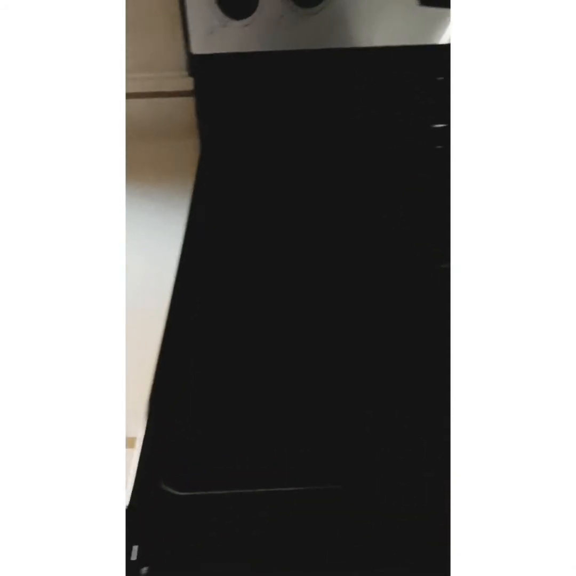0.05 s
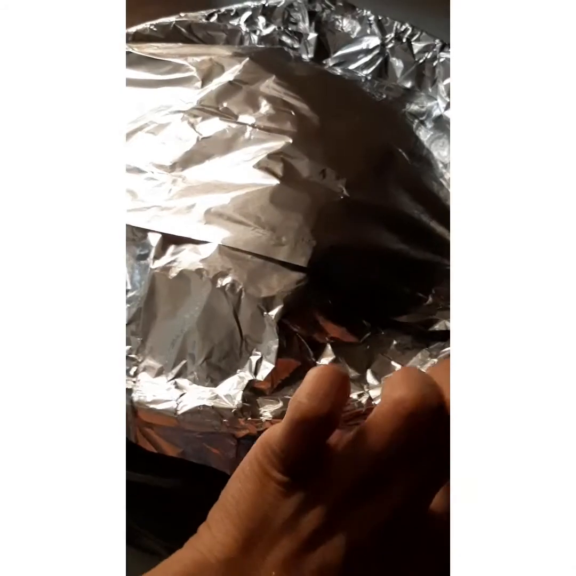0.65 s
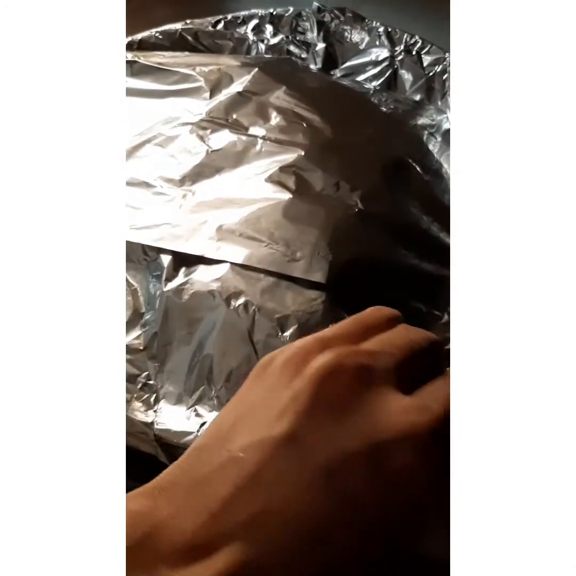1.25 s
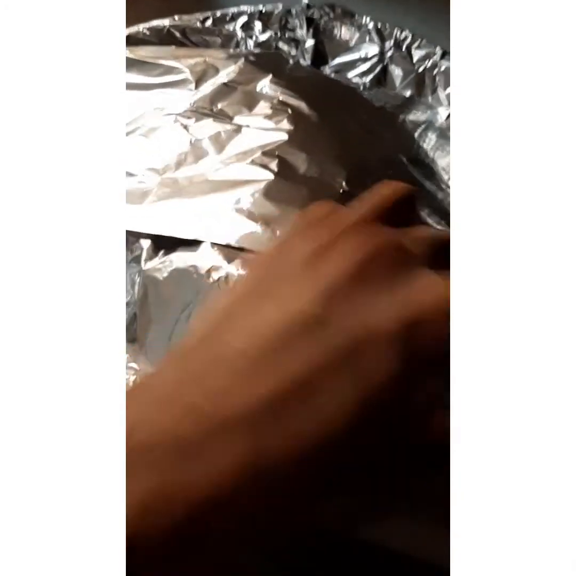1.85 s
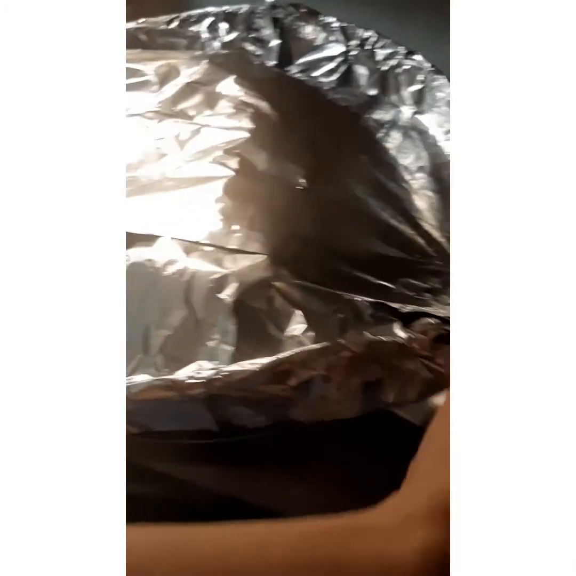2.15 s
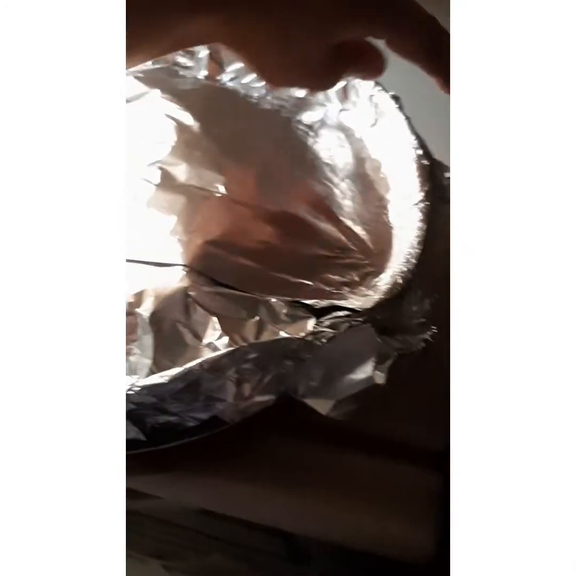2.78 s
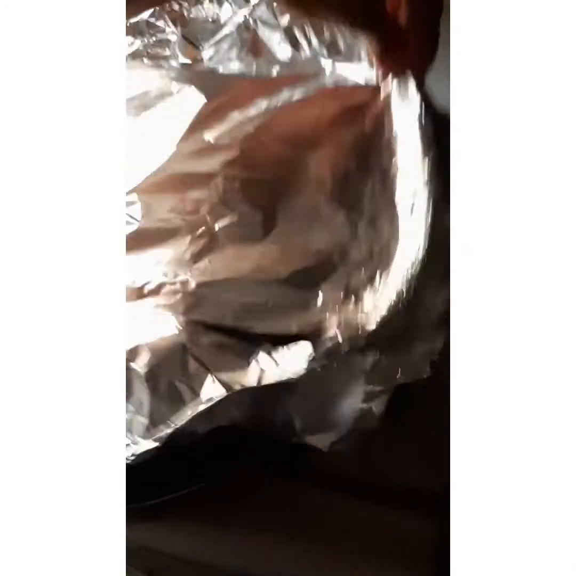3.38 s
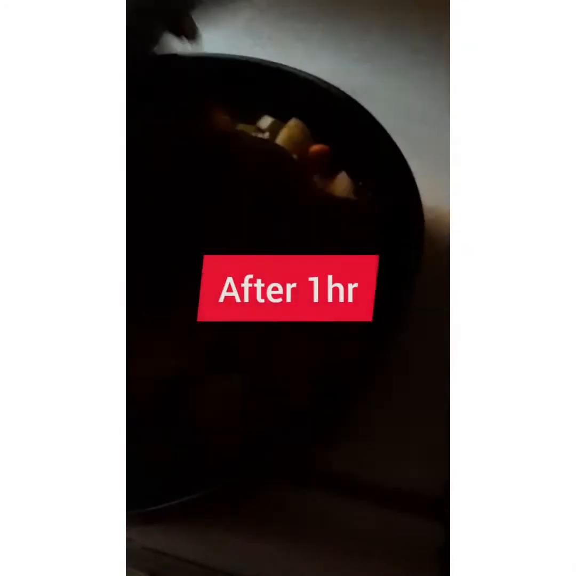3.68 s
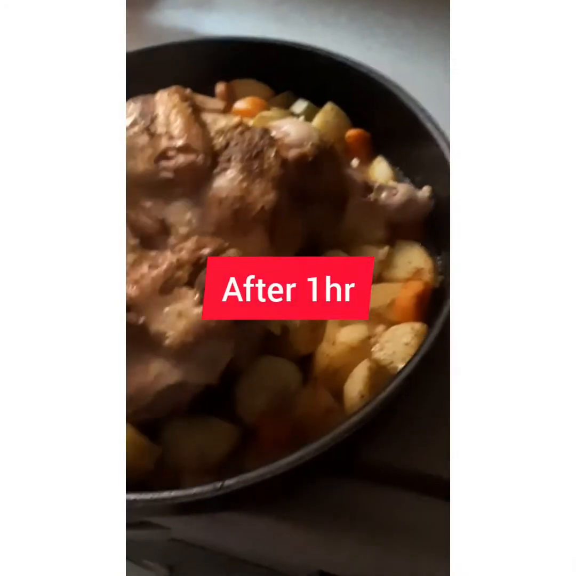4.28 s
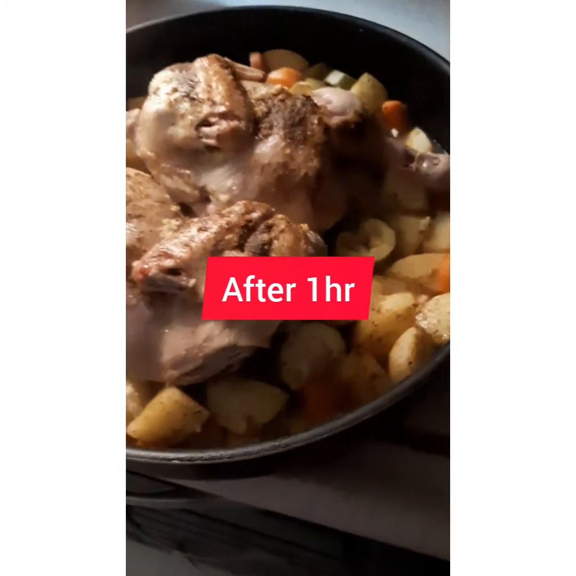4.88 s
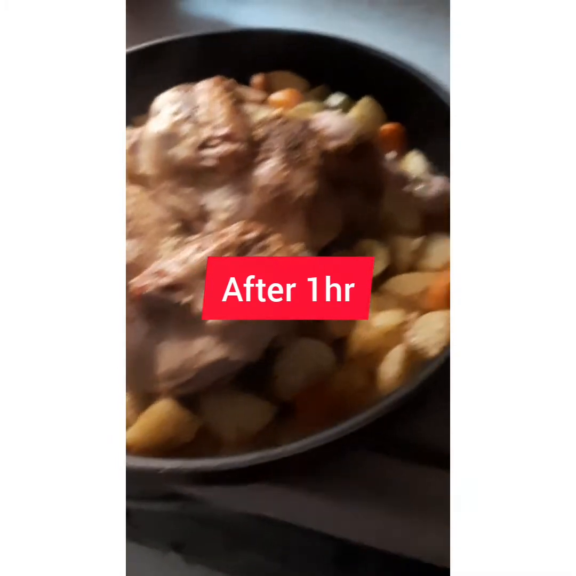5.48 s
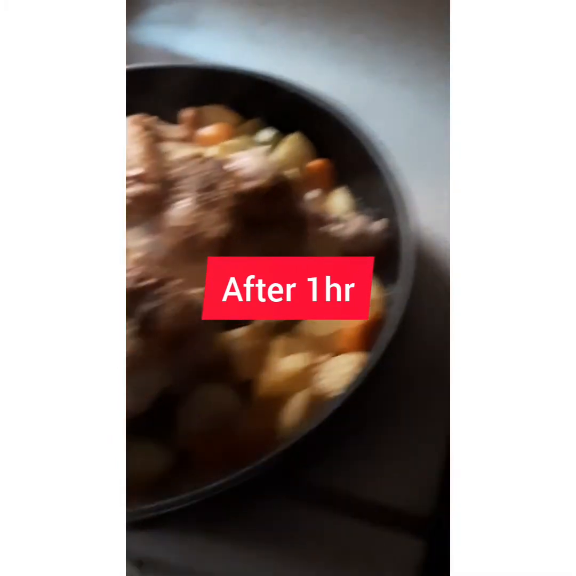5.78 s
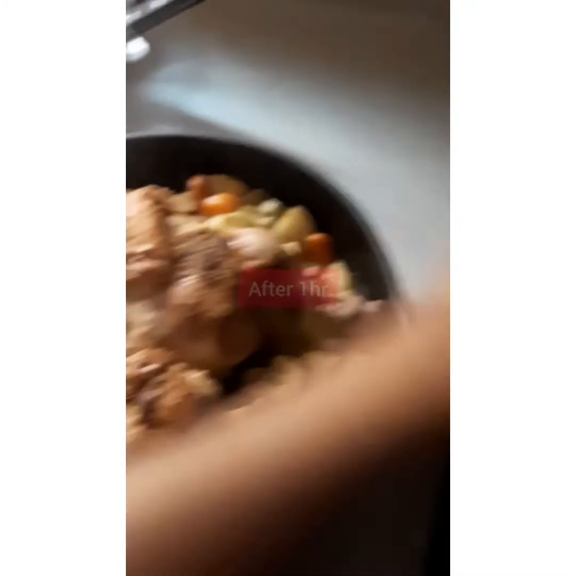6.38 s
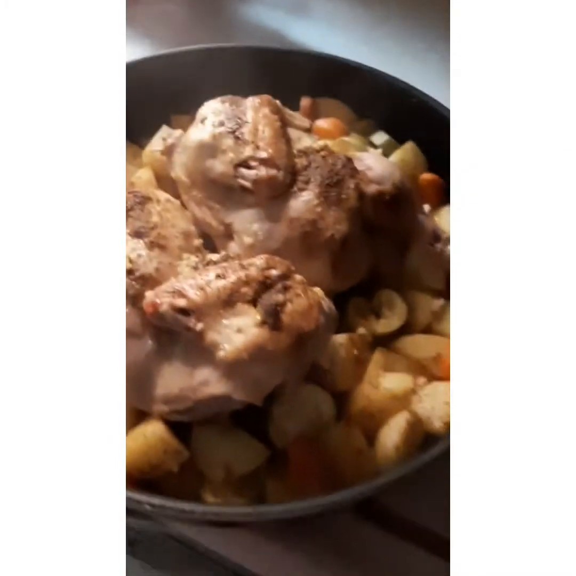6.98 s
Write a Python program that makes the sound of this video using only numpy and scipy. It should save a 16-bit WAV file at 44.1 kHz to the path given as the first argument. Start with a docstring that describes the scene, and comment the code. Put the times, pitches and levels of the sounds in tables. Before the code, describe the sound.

Aluminium foil crinkles close by as it is picked off a pan, then pulled away and crumpled, over a faint appliance hum.

```python
"""Foil off a roasting pan

A small kitchen, a phone microphone close in: aluminium foil is picked loose from the rim of a pan,
pulled off and crumpled. Every crease that buckles is a tiny click that rings a patch of the sheet for
a few milliseconds; larger folds give way in short avalanches. An appliance hums behind it, and moving
air buffets the microphone ports now and then."""
import sys
import numpy as np
from scipy import signal
from scipy.fft import rfft, irfft, next_fast_len
from scipy.io import wavfile
from scipy.ndimage import uniform_filter1d, map_coordinates

SR = 44100
rng = np.random.default_rng(int(sys.argv[2]) if len(sys.argv) > 2 else 0)


def log_audio(samples):
    """Write samples as a 16-bit WAV file to the path given in sys.argv[1]."""
    # one column per channel
    frames = np.atleast_2d(samples).T
    # limit to full scale, then quantise
    limited = np.clip(frames, -1, 1)
    pcm = np.round(limited * 32767).astype(np.int16)
    wavfile.write(sys.argv[1], SR, pcm)


N = 319284

# folds that give way: (time [s], relative level [dB], sharp part against middle part [dB])
FOLD_SNAPS = [(.349, -48.5, -9), (.422, -52, 0), (.474, -49, -19), (.53, -53, -6), (.64, -58, -14),
              (.741, -41.5, 2), (0.8, -39.5, -7), (.93, -45.5, 5), (1.019, -38, 0.5), (1.138, -44.5, 3),
              (1.167, -41.5, -2), (1.233, -45, -1), (1.277, -34, -0.5), (1.352, -31.5, -12),
              (1.365, -29, -7), (1.488, -40, 9), (1.832, -35, 5), (2.018, -37.5, 2), (2.075, -38, -2),
              (2.189, -51, 5), (2.582, -64.5, 9), (2.972, -40.5, -8), (3.109, -39, 0), (3.141, -41, 2),
              (3.2, -37, 4), (3.474, -27, -1), (3.555, -34, -2), (3.754, -31, -6), (3.867, -34.5, 2),
              (4.037, -31.5, 2), (4.264, -30, 0), (5.056, -28.5, -8), (5.38, -49, -24), (5.491, -32, -1),
              (5.599, -32, 4.5), (5.624, -34.5, -2), (5.679, -27, 5.5), (5.73, -33.5, 1), (5.833, -27, 3.5),
              (5.983, -31.5, -1), (6.025, -29, -9), (6.102, -33.5, 0.5), (6.146, -32, 1),
              (6.209, -26.5, -4), (6.265, -23, -16), (6.361, -27.5, -12), (6.409, -33, -2),
              (6.518, -25.5, 1), (6.565, -26, -3), (6.787, -33, 4)]
# how alike the two microphone ports hear: (frequency [Hz], left-right correlation [-1..1])
PORT_LIKENESS = [(100, 0.98), (300, 1), (550, 0.71), (1000, -0.19), (2000, -0.057), (16000, 0.044)]
# modes of the roasting pan: (frequency [Hz], width [Hz], gain [dB])
PAN_MODES = [(1507, 27, 14), (2048, 82, 9)]


def amp(db):
    """Decibels to gain."""
    return 10 ** (np.asarray(db) / 20)


def unit(x):
    """Scale to rms 1."""
    return x / np.sqrt(np.mean(x ** 2) + 1e-20)


def along(points, hz):
    """Interpolate (frequency [Hz], value) points on a log axis."""
    freqs, values = np.transpose(points)
    return np.interp(np.log(hz + 1), np.log(freqs + 1), values)


def curve(rows, column=1):
    """One column of a timed table, a value per sample."""
    rows = np.vstack(rows)
    return np.interp(np.arange(N) / SR, rows[:, 0], rows[:, column])


def wobble(rate):
    """A smooth random curve, rate knots a second."""
    return map_coordinates(rng.standard_normal(int(N * rate / SR) + 4), [np.arange(N) * rate / SR])


def swells(rows, attack_s, release_s):
    """Gain of (time [s], length [s], level [dB]) events that rise, hold and die away; powers add."""
    t = np.arange(N) / SR
    power = np.zeros(N)
    for s, length, db in rows:
        since = t[round(s * SR):][:SR] - s
        shape = np.clip(since / attack_s, 0, 1) * np.exp(-np.maximum(since - length, 0) / release_s)
        power[round(s * SR):][:len(since)] += (amp(db) * shape) ** 2
    return np.sqrt(power)


def filtered(x, response):
    """Pass x through a response given as a function of frequency."""
    n = x.shape[-1]
    size = next_fast_len(n + 4096)
    return irfft(rfft(x, size) * response(np.fft.rfftfreq(size, 1 / SR)), size)[..., :n]


def causal(gain):
    """The minimum-phase response with this gain."""
    cepstrum = irfft(np.log(np.maximum(gain, 1e-6)))
    half = cepstrum.shape[-1] // 2
    cepstrum[..., 1:half] *= 2
    cepstrum[..., half + 1:] = 0
    return np.exp(rfft(cepstrum))


def resonances(x, modes):
    """Ring x through (frequency [Hz], width [Hz], gain [dB]) modes."""
    return filtered(x, lambda hz: sum(amp(db) * 1j * hz * width / (f0 ** 2 - hz ** 2 + 1j * hz * width)
                                      for f0, width, db in modes))


def room_tone(level_db=-68):
    """The faint rush of the still kitchen, in which the pan's lowest mode sings."""
    # room air: (frequency [Hz], relative density [dB])
    air_spectrum = [(40, -17), (80, -7), (130, -14), (190, -6.5), (380, -9.5), (520, -14), (800, -26),
                    (1500, -25.5), (3300, -32.5), (6200, -28), (8500, -40), (12000, -29), (15500, -23)]
    noise = rng.standard_normal((2, N)) + 1.07 * rng.standard_normal(N)  # partly common to both ports
    air = filtered(noise, lambda hz: amp(along(air_spectrum, hz)))
    return amp(level_db) * unit(air + 0.74 * resonances(air, PAN_MODES[:1]))


def appliance_hum(gain_db=-2, motor_hz=67.0, motor_db=-79, waver_db=3.4):
    """A motor hums unevenly in the background, each tone wavering in level and phase."""
    # tones above the lowest: (frequency [Hz], relative level [dB])
    upper_tones = [(118.4, -70.5), (177.6, -84.5), (242.2, -84), (355.3, -78)]
    # the hum swells and sinks: (time [s], gain [dB])
    hum_swell = [(0, 0), (.6, -4.5), (.95, 3), (2.3, -1.5), (2.8, -5), (2.9, 8.5), (3.2, 0), (4.7, 5),
                 (5.4, 7.5), (7.2, 1.5)]
    t = np.arange(N) / SR
    hum = np.zeros(N)
    for hz, db in [(motor_hz, motor_db)] + upper_tones:
        peak = np.sqrt(2) * amp(db + gain_db + waver_db * wobble(16))
        hum += peak * np.sin(2 * np.pi * hz * t + 0.15 * wobble(4.1))
    return hum * amp(curve(hum_swell))


def draught(left_db=-17.0, right_db=0.0, lumpy_db=3.5):
    """Gusts of moving air buffet the microphone ports, mostly the right one."""
    # rumble at the ports: (frequency [Hz], relative density [dB])
    buffet_spectrum = [(25, -31), (45, -4.5), (70, 5), (110, -1), (200, -16), (400, -39), (1000, -79.5)]
    # gusts: (time [s], length [s], relative level [dB])
    gusts = [(.01, .07, -58), (1.8, 0.14, -47), (2.01, 0.027, -47), (3.3, .16, -58), (4.25, 0.079, -58),
             (6.02, 0.041, -57), (6.665, 0.085, -43.5), (6.8, .21, -33), (7.06, 0.24, -43)]
    rumble = filtered(rng.standard_normal((2, N)), lambda hz: amp(along(buffet_spectrum, hz)))
    rumble = unit(rumble * amp(lumpy_db * wobble(18)))
    return rumble * swells(gusts, attack_s=0.042, release_s=0.038) * amp([[left_db], [right_db]])


def kitchen_reverb(x):
    """Hard walls and cupboards answer; each frequency dies at its own speed."""
    # the room's decay: (frequency [Hz], time to fall 60 dB [s])
    decay_times = [(150, 0.77), (1500, 0.75), (5500, 0.41), (14000, 0.52)]
    hz, t, bands = signal.stft(rng.standard_normal((2, SR * 3 // 4)), SR, nperseg=256)
    alike = np.clip(along(PORT_LIKENESS, hz), -1, 1)[:, None]
    bands[1] = alike * bands[0] + np.sqrt(1 - alike ** 2) * bands[1]
    decay = amp(-60 * t / along(decay_times, hz)[:, None])
    tail = signal.istft(bands * decay, SR, nperseg=256)[1]
    tail = np.pad(tail / np.linalg.norm(tail[0]), ((0, 0), (220, 0)))  # arrives 5 ms late
    return signal.fftconvolve(x, tail, axes=1)[:, :N]


def with_close_reflection(foil):
    """A hard surface just under the foil mirrors it, combing its colour as the sheet moves."""
    # the bounce: (time [s], extra path [m], strength [0..1])
    bounce = [(0, 0.17, 0.1), (1.3, .39, 0.16), (5.6, 0.2, 0), (5.85, 0.18, 0.5), (6.0, 0.19, 0.64),
              (6.14, 0.2, .35), (6.2, 0.19, 0.26)]
    now = np.arange(N)
    earlier = now - curve(bounce, 1) * SR / 343
    softened = filtered(foil, lambda hz: 1 / (1 + (hz / 2200) ** 2))  # wrinkles scatter the treble
    return foil + curve(bounce, 2) * np.array([np.interp(earlier, now, side) for side in softened])


def pan_ring(foil):
    """The crimped rim rings until it is prised loose; the pan rings less once the foil is off."""
    # foil crimped tight on the rim: (frequency [Hz], width [Hz], gain [dB])
    rim_modes = [(1350, 1000, 12.5), (2330, 430, 13.5), (3090, 150, 2)]
    # how firmly the foil drives the rim: (time [s], share [0..1])
    rim_contact = [(.85, 0.13), (1.1, 0.23), (1.35, 0.07)]
    # how firmly it drives the pan: (time [s], share [0..1])
    pan_contact = [(1.7, 0.41), (2.1, 0.82), (3.0, 0.18), (3.8, 0.12)]
    rim = resonances(foil * curve(rim_contact), rim_modes)
    return rim + resonances(foil * curve(pan_contact), PAN_MODES)


def panel_flaps(t60=0.07, rise_s=0.0077, spread=0.446, count=9):
    """A wide panel of the sheet pops over: a cluster of low, quickly damped modes."""
    # flaps and bumps: (time [s], relative peak [dB], centre pitch [Hz])
    flaps = [(1.37, -24.5, 747), (1.825, -26, 682), (1.897, -46, 55), (2.032, -43, 65), (3.394, -19, 524),
             (3.559, -36, 199), (3.818, -29, 460), (4.013, -26, 698), (4.159, -40, 395.3),
             (4.219, -26.5, 259), (4.295, -26, 188), (4.345, -28, 280), (4.389, -48, 714),
             (5.457, -37, 115), (6.039, -28, 149), (6.563, -17, 671)]
    out, t = np.zeros(N + SR), np.arange(SR // 4) / SR
    envelope = amp(-60 * t / t60) * (1 - np.exp(-t / rise_s))
    for s, db, hz in flaps:
        modes_hz = hz * np.exp(spread * (np.linspace(-1.5, 1.5, count) + 0.13 * rng.standard_normal(count)))
        ring = rng.choice([-1, 1], count) @ np.sin(2 * np.pi * np.outer(modes_hz, t)) * envelope
        out[round(s * SR):][:len(t)] += amp(db - 7.0) * ring / np.abs(ring).max()
    return out[:N]


def patch_ring(t60, click, colour_db):
    """One patch of foil, in stereo: a click, then a dense short ring in its own uneven colour."""
    t = np.arange(2048) / SR
    ring = rng.standard_normal((2, len(t))) * amp(-60 * t / t60)
    ring /= np.linalg.norm(ring[0])
    left_lag = rng.integers(3, 22)  # the foil lies nearer to the right port
    ring[0, left_lag] += click
    ring[1, 0] += click
    heights = rng.standard_normal(22) * np.linspace(1, .5, 22)
    bumps = np.transpose([np.geomspace(200, 16000, 22), heights])
    ring = filtered(ring, lambda hz: causal(amp(colour_db * along(bumps, hz))))
    return ring / np.sqrt(np.sum(ring ** 2) / 2)


def sheet_bands(clicks, low_hz, high_hz):
    """Clicks in the sheet's colour, split into dull, middle and sharp; both ports hear the bass alike."""
    # the sheet's colour: (frequency [Hz], gain [dB])
    foil_spectrum = [(40, -20.5), (70, -12.5), (115, -6), (200, -6), (340, -5.5), (520, -3.5), (800, -3),
                     (1300, -2.5), (2100, -3.5), (3000, -1.5), (4500, 0.5), (6800, -0.5)]

    def mid_side(hz):
        angle = np.arccos(np.clip(along(PORT_LIKENESS, hz), -1, 1)) / 2
        colour = causal(amp(along(foil_spectrum, np.minimum(hz, 6800))))
        return colour * [np.cos(angle), np.sin(angle)]

    mid, side = filtered(clicks, mid_side)
    pair = np.array([mid + side, mid - side])
    dull = filtered(pair, lambda hz: 1 / (1 + (hz / low_hz) ** 4))
    sharp = filtered(pair, lambda hz: 1 - 1 / (1 + (hz / high_hz) ** 8))
    return dull, pair - dull - sharp, sharp


def fold_snaps(mean_delay_s=.003, follower_size=0.75, followers=7, dull_db=-10):
    """A fold gives way with one crack and drags a few neighbouring creases with it."""
    out = np.zeros((2, N + SR))
    for s, db, sharp_db in FOLD_SNAPS:
        clicks = np.zeros(SR // 10)
        delays = np.minimum(rng.exponential(mean_delay_s, followers) * SR, len(clicks) // 2).astype(int)
        clicks[delays] = follower_size * rng.choice([-1, 1], followers)
        clicks[0] = 1
        ring = patch_ring(t60=0.095, click=0.34, colour_db=4.5)
        burst = signal.fftconvolve(clicks[None] / np.linalg.norm(clicks), ring, axes=1)
        dull, middle, sharp = sheet_bands(burst, low_hz=1930, high_hz=8100)
        snap = middle + amp(dull_db) * dull + amp(sharp_db) * sharp
        out[:, round(s * SR):][:, :snap.shape[1]] += amp(db + 31) * snap
    return out[:, :N]


def taut_dip(hold_s=0.018, depth=0.25):
    """Gain on the crackle, which falters as each fold holds taut just before it snaps."""
    t = np.arange(N) / SR
    snap_times = np.array([s for s, *_ in FOLD_SNAPS] + [np.inf])
    wait = snap_times[np.searchsorted(snap_times, t)] - t
    return 1 - depth * uniform_filter1d(np.exp(-(wait / hold_s) ** 2), size=200)


def handling(jerk_db=1.5, jerk_rate=34, sharpen=0.26):
    """Crackle, flexing and sharpness in dB: squeezes ride on a jerky pull and sharpen the creases."""
    # two steady pulls, along the rim, then lifting and crumpling the loose sheet:
    # (time [s], crackle level [dB], relative flexing of the sheet [dB], relative sharpness [dB])
    pulls = [
        [(.62, -69, -23, -12), (.83, -47.5, -8.5, -8), (1.06, -47.5, -16, -7.5), (1.125, -54.5, -8, -11),
         (1.19, -46.5, -11, -7), (1.34, -49, -7.5, -11.5), (1.54, -39, -11, -5.5), (1.73, -43.5, -11, -9),
         (1.94, -52.5, -7, -9), (2.16, -51.5, -3.5, -8.5), (2.28, -75, -9, -9)],
        [(2.89, -51, -9, -5.5), (3.25, -39.5, -13, -8), (3.35, -32.5, -12.5, -1.5), (3.73, -37.5, -13, -3.5),
         (3.9, -40, -6, -3.5), (4.02, -34, -8, -3.5), (4.33, -34.5, -6, -2), (4.46, -37.5, -12, -3.5),
         (4.55, -45, -11.5, -6.5), (4.9, -45.5, -13.5, -5), (5.1, -40, -13.5, -2.5), (5.62, -36.5, -11.5, -4.5),
         (5.95, -43, -11, -6.5), (6.13, -41.5, -10, -8), (6.32, -33, -13, -3.5), (6.61, -36, -11.5, -6),
         (6.91, -41.5, -9.5, -10), (7.24, -69, 4.5, -23.5)],
    ]
    # the fingers squeeze or tug: (time [s], length [s], crackle level [dB])
    squeezes = [(.24, 0.14, -75), (.35, 0.19, -58.5), (.645, 0.22, -51.5), (.79, 0.046, -42),
                (.985, 0.072, -42.5), (1.272, 0.037, -43.5), (1.359, 0.15, -34.5), (1.585, 0.078, -36),
                (1.75, 0.099, -37), (1.83, 0.028, -34.5), (2.003, 0.036, -41), (2.168, 0.027, -43.5),
                (2.58, 0.071, -76), (2.903, .075, -43.5), (3.02, 0.031, -40), (3.305, .12, -25.5),
                (3.59, 0.043, -35), (3.805, 0.059, -39), (3.918, 0.044, -41), (4.758, 0.05, -42.5),
                (4.968, 0.11, -36.5), (5.128, 0.063, -30), (5.255, 0.038, -33), (5.44, 0.057, -35),
                (5.667, 0.039, -39), (5.772, .13, -40), (5.975, 0.094, -35), (6.138, 0.033, -33.5),
                (6.238, 0.046, -27.5), (6.345, 0.052, -36), (6.476, 0.068, -28), (6.555, 0.039, -28.5),
                (6.757, 0.048, -29.5)]
    t = np.arange(N) / SR
    pull_db, flex_db, sharp_db = (curve(pulls, column) for column in (1, 2, 3))
    pulling = sum(1.0 * (t >= rows[0][0]) * (t <= rows[-1][0]) for rows in pulls)
    pull = amp(pull_db + jerk_db * wobble(jerk_rate)) * uniform_filter1d(pulling, size=900)
    squeeze = swells(squeezes, attack_s=0.014, release_s=0.028)
    level_db = 20 * np.log10(np.hypot(pull, squeeze) * taut_dip() + 1e-6)
    return level_db, flex_db, sharp_db + sharpen * np.maximum(level_db - pull_db, 0)


def crinkle(base_rate=1050, growth=.25, size_db=2.0, rub=0.57, wander=3, patches=170):
    """Creases buckle at random, more of them under harder handling, travelling from patch to patch."""
    level_db, flex_db, sharp_db = handling()
    creases_per_s = base_rate * amp(growth * (level_db + 40))
    onsets = np.flatnonzero(rng.random(N) < creases_per_s / SR)
    sizes = amp(size_db * np.minimum(rng.standard_normal(N), 2.2)) * rng.choice([-1, 1], N)
    patch_of = np.round(np.arange(N) * patches / N + wander * (rng.random(N) - .5))[onsets]
    crackle = np.zeros((2, N + SR))
    for patch in range(patches):
        ring = patch_ring(t60=0.031, click=0.35, colour_db=3.5)
        hits = onsets[patch_of == patch]
        if len(hits):
            clicks = np.bincount(hits - hits[0], sizes[hits])
            rung = signal.fftconvolve(clicks[None], ring, axes=1)
            crackle[:, hits[0]:][:, :rung.shape[1]] += rung
    power = np.abs(uniform_filter1d(np.mean(crackle[:, :N] ** 2, 0), size=700))
    crackle = crackle[:, :N] / np.sqrt(power + 1e-5)  # the creases share out the work of the hand
    hiss = rub * rng.standard_normal((2, N))  # layers slide on each other
    dull, middle, sharp = sheet_bands(crackle + hiss, low_hz=1050, high_hz=7220)
    sheet = amp(-1.5) * unit(middle) + amp(flex_db - 1.5) * unit(dull) + amp(sharp_db + 5.5) * unit(sharp)
    return amp(level_db) * sheet


def scene():
    """Close foil in the kitchen; the background drops out for an instant near the start and swells back."""
    # the foil's stereo balance: (frequency [Hz], left minus right [dB])
    balance = [(60, -4.5), (120, 0.5), (240, 0), (480, -2.5), (950, -1), (1890, 1), (3770, 1.5),
               (7520, 2.5), (15000, 0)]
    # the background's dip and return: (time [s], gain [dB])
    background_gain = [(.09, -5.5), (.1, -43), (.125, -40), (.135, -8.5), (.35, -5), (.9, 1.5)]
    foil = with_close_reflection(crinkle() + fold_snaps())
    foil = foil + pan_ring(foil) + panel_flaps()
    foil = foil + amp(-10.0) * kitchen_reverb(foil)
    foil = filtered(foil, lambda hz: amp(np.outer([.5, -.5], along(balance, hz))))
    background = draught() + appliance_hum() + room_tone()
    return foil + background * amp(curve(background_gain))


def record(dry):
    """The phone's ports notch the treble, and it keeps nothing above its band limit."""
    # microphone response: (frequency [Hz], gain [dB])
    port_response = [(7400, 0), (8000, -4), (8600, -10.5), (9600, -7), (11500, -1.5), (15800, -4.5)]
    top_hz = 16000
    coloured = filtered(dry, lambda hz: causal(amp(along(port_response, hz))))
    return filtered(coloured, lambda hz: 1 / (1 + (hz / top_hz) ** 240))


dry = scene()
out = record(dry)
log_audio(out)
```